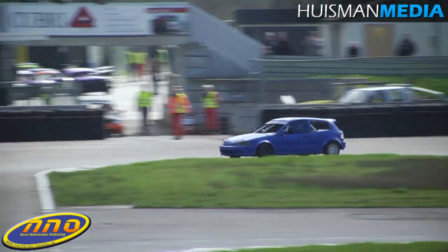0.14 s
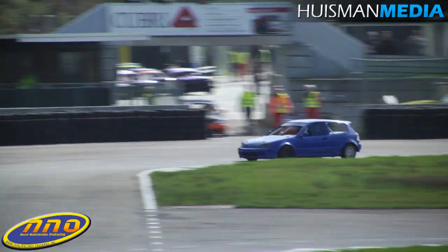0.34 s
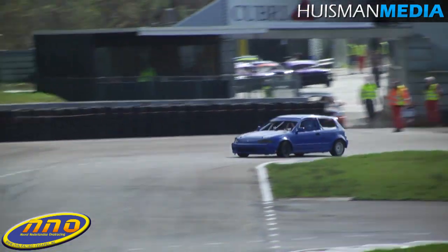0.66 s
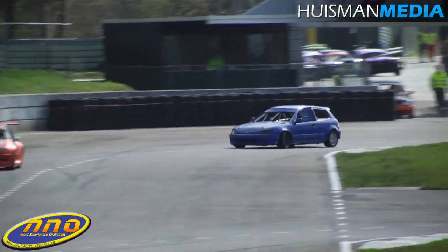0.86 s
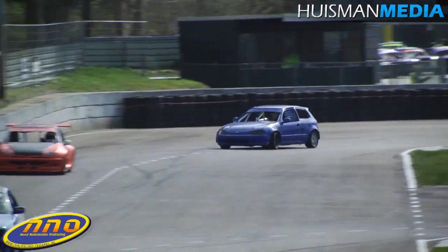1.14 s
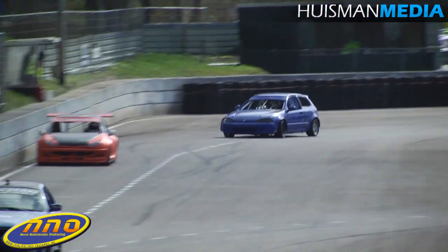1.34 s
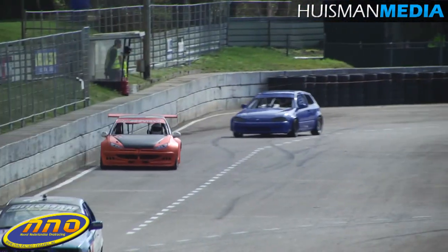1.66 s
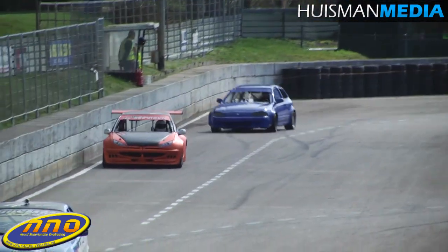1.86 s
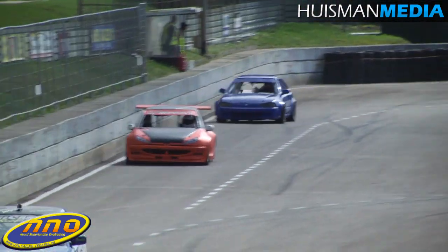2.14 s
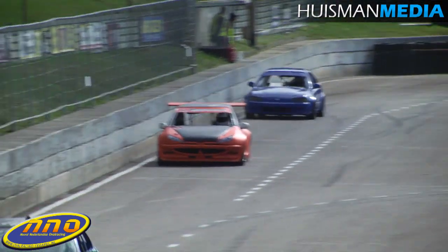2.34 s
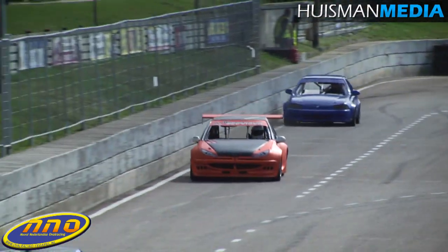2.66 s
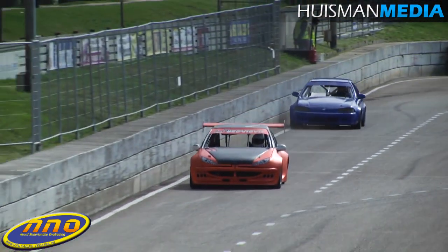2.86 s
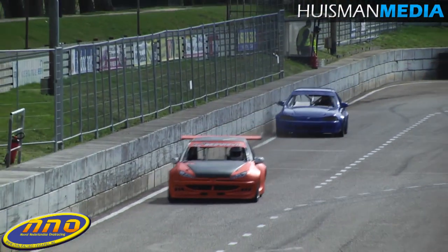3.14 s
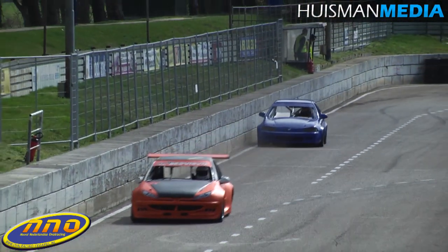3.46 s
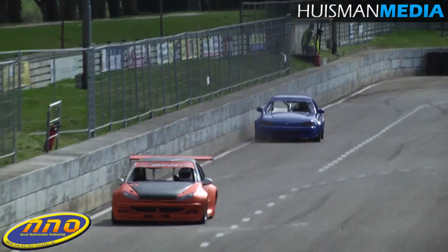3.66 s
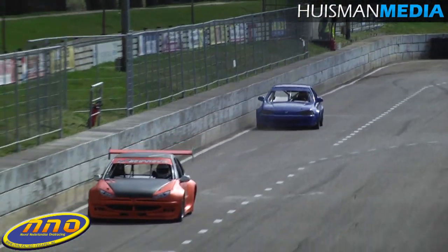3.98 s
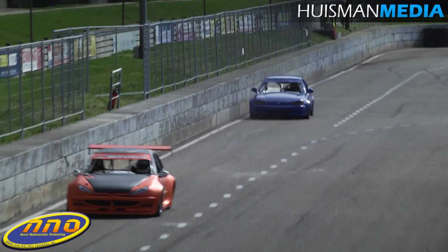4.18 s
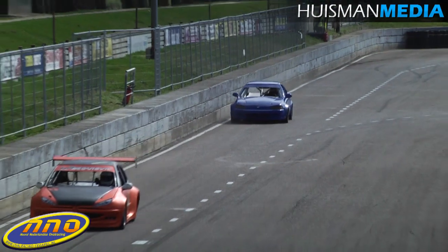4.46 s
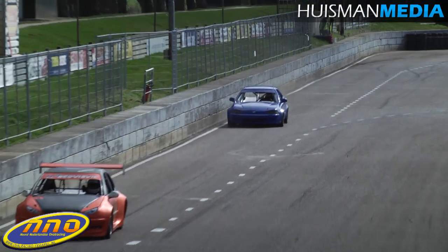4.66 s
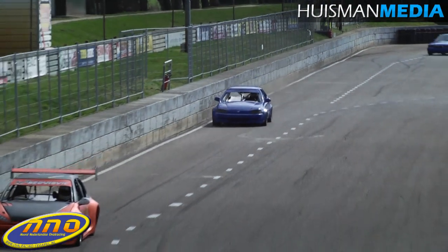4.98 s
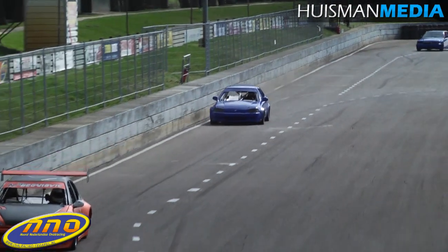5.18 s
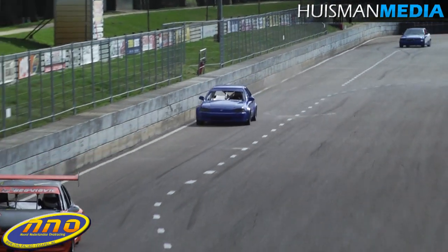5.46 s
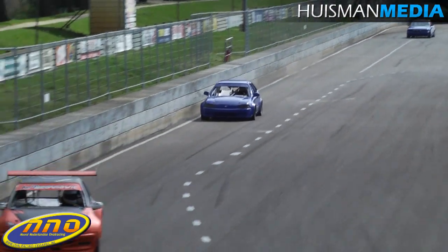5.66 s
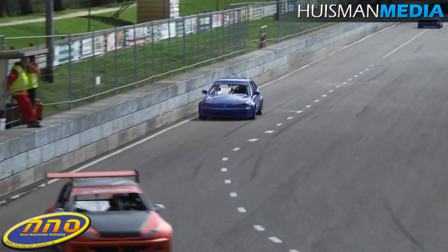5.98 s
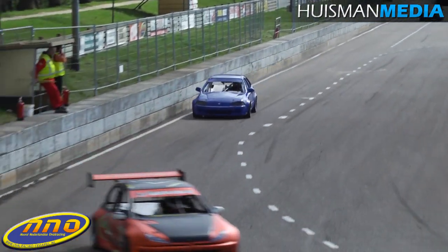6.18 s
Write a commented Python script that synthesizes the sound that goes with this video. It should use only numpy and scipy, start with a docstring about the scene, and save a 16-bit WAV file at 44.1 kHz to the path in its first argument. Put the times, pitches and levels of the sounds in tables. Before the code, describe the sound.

Several race cars leave a bend and approach a trackside microphone on an outdoor circuit. A high engine lifts off in the distance, then a hatchback blips and rattles as it pulls away. A deeper, booming car climbs through its revs while tyres chirp briefly. It slows with a falling gear whine, other engines rev up, and an exhaust bangs near the end. Road rumble and intake rasp run underneath.

```python
"""Race cars leave a bend and come down a walled straight, each sounding its firing rate and overtones.
From the start, over road rumble and intake rasp, a six-cylinder lifts far off and a winged car booms.
A hatchback blips and rattles out of the bend while the winged car climbs through its revs. Midway a tyre
chirps by stick-slip and a car coasts in the pit lane. The winged car brakes with whining gears; last,
the hatchback pulls in its next gear, the pit car revs, and unburnt fuel bangs in an exhaust."""
import sys
import numpy as np
from scipy import signal
from scipy.fft import rfft, irfft, next_fast_len
from scipy.io import wavfile
from scipy.ndimage import uniform_filter1d, map_coordinates

SR = 44100
rng = np.random.default_rng(int(sys.argv[2]) if len(sys.argv) > 2 else 0)


def digitize_waveform(pressure):
    """Quantize a signal to 16-bit integers and store it at the path in sys.argv[1].

    Rows of a 2-D input are taken as channels; values are limited to [-1, 1].
    """
    field = np.atleast_2d(pressure).T
    bounded = np.clip(field, -1, 1)
    quanta = np.round(bounded * 32767).astype(np.int16)
    wavfile.write(sys.argv[1], SR, quanta)


N = 278712

# noise spectra: (frequency [Hz], relative spectral density [dB])
RUMBLE_SPECTRUM = [(20, -16.5), (40, -6.5), (65, -2), (100, 3.5), (140, -4.5), (200, -9.5), (400, -68)]
DRONE_SPECTRUM = [(100, -41), (160, -16.5), (200, 5.5), (280, 5), (340, -2), (450, 1.5), (560, -2.5),
                  (650, -9.5), (800, -2), (980, -13), (1200, -9), (1500, -28.5), (2500, -66)]
RASP_SPECTRUM = [(500, -39), (900, -2), (1150, -3), (1400, -0.5), (1800, -0.5), (2100, -1.5), (2500, -1.5),
                 (3000, -4), (3300, -10), (3700, -19.5), (4200, -30.5), (6000, -56)]
HISS_SPECTRUM = [(3000, -37.5), (4200, -7), (5100, 1), (6100, -2), (6900, -12.5), (8200, -19.5),
                 (10500, -26), (12000, -38.5), (15500, -46.5)]
TICK_SPECTRUM = [(5000, -17.5), (7500, -1), (9500, 0.5), (11500, -9), (15000, -14)]
BACKFIRE_SPECTRUM = [(30, -20), (90, -2), (300, 0), (600, -2), (1000, -7), (2800, -19), (4000, -40),
                     (7000, -66), (10000, -100)]
GAS_SPECTRUM = [(120, -20), (180, 6.5), (300, -2), (450, -1.5), (620, -10.5), (760, -9.5), (900, -5),
                (1000, -16), (1300, -13.5), (2000, -27.5), (4000, -72.5)]
# envelopes of the background noises: (time [s], relative level [dB])
RUMBLE_LEVELS = [(0, -46), (.8, -46), (1.2, -42), (2.2, -39.5), (2.5, -43), (3.15, -46), (3.5, -56),
                 (4.15, -48), (4.55, -52), (5.1, -38.5), (6.32, -39)]
DRONE_LEVELS = [(0, -30), (.6, -30.5), (1.3, -30.5), (2, -29), (2.6, -26.5), (3, -29.5), (3.7, -31),
                (4.35, -31), (5.3, -23.5), (5.6, -26), (6.32, -28)]
RASP_LEVELS = [(0.05, -42.5), (0.35, -43.5), (2.24, -36.5), (2.26, -40), (2.44, -35), (3.13, -41),
               (3.41, -39), (3.43, -46), (3.78, -41.5), (4.54, -41.5), (4.96, -32.5), (5.19, -32.5),
               (5.45, -35), (5.81, -31.5), (5.9, -36), (6.3, -37.5)]
# brief swells of the hiss: (time [s], half width [s], rise [dB])
HISS_SWELLS = [(.25, 0.2, 8), (1.42, 0.087, 4.5), (2.62, 0.092, 3.5), (3.25, 0.14, 3), (4.05, .09, 2.5)]
# likeness of the noise at left and right: (frequency [Hz], correlation [1])
STEREO_COHERENCE = [(30, .88), (70, .965), (130, .978), (300, .991), (600, .988), (1200, .97), (3000, .95),
                    (4200, .65), (6000, .2), (12000, .05)]
# reverberation off walls and stands: (frequency [Hz], time to fall 60 dB [s])
REVERB_TIMES = [(150, 1), (1000, 1), (5000, 0.037)]
# short transients: (time [s], level [dB])
TICKS = [(.555, -76), (.588, -73.5), (.655, -76), (.737, -79), (.922, -73), (.96, -76), (1.17, -77),
         (1.21, -77)]
BACKFIRES = [(.637, -30), (6.047, -22), (6.0815, -19.5), (6.085, -19.5)]
# gliding tones: (peak time [s], half width [s], frequency [Hz], glide [Hz/s], level [dB])
LONE_ENGINE_NOTES = [(.68, .05, 915, -400, -31), (1.03, .18, 930, 75, -39), (1.08, .3, 451, 75, -32)]
TYRE_CHIRPS = [(2.74, 0.11, 1140, -350, -36), (3.144, 0.042, 799, 0, -23), (3.222, .03, 820, -900, -22),
               (3.362, 0.038, 816, -350, -24), (3.92, 0.036, 805, 0, -34), (4.035, 0.035, 858, -600, -33)]
WINGED_HIGH_OVERTONES = [(4.88, .045, 1890, -1400, -37), (5, .07, 1735, -700, -38),
                         (4.97, .08, 1900, -700, -41), (5.13, .06, 1445, -550, -37)]
# tooth-meshing tone: (time [s], frequency [Hz], level [dB])
GEAR_MESH = [(4.84, 2720, -48), (4.89, 2660, -41), (4.98, 2590, -43), (5.07, 2495, -40),
             (5.18, 2415, -38.5), (5.26, 2320, -44), (5.35, 2255, -41), (5.42, 2170, -50),
             (5.58, 2030, -44)]
# gear pairs that whine together: (ratio to the mesh frequency [1], relative level [dB])
GEAR_PAIRS = [(1, 0), (.958, -3)]
# engine speeds: (time [s], firing rate [Hz])
SIX_REVS = [(0, 348), (.38, 365), (.5, 346)]
PIT_REVS = [(2.8, 102), (3.15, 112), (4.1, 66), (4.25, 117), (4.98, 52), (5.24, 66), (5.33, 97),
            (5.42, 121), (5.48, 150), (5.54, 175), (5.63, 196), (5.8, 174), (5.97, 202), (6.32, 180)]
HATCH_BEND_REVS = [(.6, 336), (.64, 349), (.69, 349), (.75, 321), (.79, 299), (.86, 280), (.93, 259),
                   (1.05, 267.6), (1.6, 286), (2.22, 306), (2.32, 296), (3, 279)]
HATCH_STRAIGHT_REVS = [(4, 226), (4.3, 233), (4.6, 248), (5, 255), (6.07, 290), (6.17, 275), (6.32, 273)]
WINGED_REVS = [(0, 186), (.2, 175), (.5, 190), (1, 223), (1.15, 199), (1.45, 210), (1.65, 198), (2.5, 245),
               (3.7, 293), (4.12, 304), (4.27, 286), (4.5, 277), (5.1, 208), (5.4, 190)]
# spells when an engine sounds louder, pulling or booming on the overrun, ahead of dips and resonance:
# (start [s], end [s], firing tone level [dB], its swell [dB/s], overtone level [dB])
SIX_SURGES = [(-.03, .1, -17.5, 1.5, -32), (.09, 0.402, -21, -6.5, -28)]
PIT_SURGES = [(5.28, 5.37, -20.5, -4, -26.5), (5.46, 5.56, -30, 0, -24), (5.52, 5.67, -18, -4, -33),
              (5.86, 6.01, -22, 7, -37)]
HATCH_BEND_SURGES = [(.62, .73, -17, 0, -40), (.635, .75, -30, 0, -29.5), (.76, .86, -24.5, 25, -26),
                     (.88, 1.2, -25.5, -3, -26), (1.15, 1.85, -24.5, 0, -25.3),
                     (1.85, 2.05, -21.3, 0, -25.3), (2.05, 2.23, -21.5, 0, -25.8),
                     (2.25, 2.45, -21.5, 16, -33)]
HATCH_STRAIGHT_SURGES = [(4.95, 5.31, -27.5, 13, -33), (5.5, 5.66, -25, 0, -33), (5.65, 5.88, -19, 8, -33),
                         (5.88, 6.08, -17.5, 0, -39), (6.08, 6.32, -20.5, -1, -39)]
WINGED_SURGES = [(.05, .38, -27.5, 3, -41), (.47, .76, -22.5, -8, -42.5), (1.12, 1.56, -23.5, -8, -36),
                 (1.9, 2.5, -27, 13, -39), (2.47, 4.15, -15.4, 1.5, -31.5), (4.23, 4.28, -19.5, 2, -36),
                 (4.65, 5.02, -24.5, 13, -36.5), (5.02, 5.3, -23, -6, -38)]
# intake and exhaust overtones: (multiple of the four-stroke cycle rate [1], relative level [dB])
AIRBOX_HARMONICS = [(25, -13), (26, 0), (27, -5), (28, -11)]
SIX_HARMONICS = [(3, -15), (4, -10), (5, -21), (7, -20), (8, -24), (9, -17), (10, -24), (12, -15),
                 (13, -18), (14, -13), (15, -19), (16, -18), (18, -25), (20, -26), (22, -25), (25, -26),
                 (26, -23), (27, -25), (28, -24), (30, -28), (33, -30), (36, -30), (38, -29), (42, -27),
                 (45, -29), (48, -31)]
WINGED_HARMONICS = [(3, -17), (5, -20), (6, -27), (7, -23), (9, -32), (10, -33), (11, -29), (12, -30)]
# exhaust overtones: (multiple of the crankshaft rate [1], relative level [dB])
PIT_HARMONICS = [(1, -5), (3, -6), (4, 3), (5, -10), (6, -8), (7, -17), (8, -18), (10, -21)]
HATCH_BEND_HARMONICS = [(1, -13), (3, -3), (4, -5), (5, -6), (6, -5), (7, -15), (8, -20), (9, -18),
                        (10, -25), (11, -22), (12, -27), (13, -25), (15, -25), (16, -25)]
HATCH_STRAIGHT_HARMONICS = [(3, -7), (4, 0), (5, -13), (6, -9), (7, -15), (8, -8), (12, -12), (14, -11)]
# brief dips in an engine's sound: (time [s], half width [s], depth [dB])
PIT_DIPS = [(3.72, 0.33, 5.5), (4.13, 0.059, 4)]
HATCH_DIPS = [(.93, .05, 11), (1.58, .15, 9), (5.79, .015, 9), (5.9, .015, 4), (5.97, .018, 7),
              (6.03, .015, 9), (6.115, .02, 5)]
WINGED_DIPS = [(2.7, .015, 6), (2.875, .02, 4), (3.115, .02, 7), (3.195, .015, 9), (3.27, .025, 8),
               (3.58, .025, 3.5), (3.68, .018, 4), (4.21, .02, 9)]
# exhaust resonances: (frequency [Hz], relative gain [dB])
PIT_SILENCER = [(38, -12), (58, 1), (110, 2), (150, -2), (200, -2), (250, 2), (320, 4), (365, -1), (420, 0),
                (600, 1)]
RATTLE_PIPE = [(80, -22), (170, -1), (300, 0), (480, -1), (650, -11), (1000, -17), (1400, -20), (2200, -32),
               (4000, -70)]
HATCH_SIDE_PIPE = [(300, 0), (400, 2.5), (425, 0), (440, -2), (456, 7), (475, 1), (520, -5), (560, 0),
                   (600, 3), (650, -3), (700, 0), (750, 3), (815, 4), (855, 4), (880, 1), (910, 1),
                   (940, 2), (990, -9), (1045, -8), (1075, 0), (1240, 3), (1400, -3), (1800, 1)]
HATCH_FRONT_PIPE = [(500, 0), (535, 0), (565, -5), (850, -2), (1040, 0), (1100, 4), (1200, 0), (1600, 3),
                    (1800, 0), (1880, 2), (1930, 8), (1980, 3), (2030, 0)]
# pipe resonance that the octave slides through: (frequency [Hz], level re the firing tone [dB])
WINGED_PIPE = [(350, -15), (425, -9), (450, -7), (468, -13), (483, -7), (497, -16), (510, -11), (520, -24),
               (600, -36)]

TIME = np.arange(N) / SR


def amp(db):
    """Amplitude ratio of a level in decibels."""
    return 10 ** (np.asarray(db) / 20)


def unit(x):
    """Normalisation to an rms of 1."""
    return x / np.sqrt(np.mean(x ** 2) + 1e-20)


def along(points, hz):
    """Interpolation of (frequency [Hz], value) points on a logarithmic frequency axis."""
    freqs, values = np.transpose(points)
    return np.interp(np.log(hz + 1), np.log(freqs + 1), values)


def curves(rows):
    """Linear interpolation in time: one curve for each column after the first."""
    times, *columns = np.transpose(rows)
    return [np.interp(TIME, times, column) for column in columns]


def during(rows, fade_s=0.12):
    """Trapezoidal window: 1 over a table's time span, fading to 0 outside."""
    return np.clip(1 + np.minimum(TIME - rows[0][0], rows[-1][0] - TIME) / fade_s, 0, 1)


def bump(peak_s, width_s):
    """Gaussian window of height 1."""
    return np.exp(-((TIME - peak_s) / width_s) ** 2)


def dips(rows):
    """Brief attenuation: a gain of 1 with bell-shaped dips."""
    return amp(-sum(depth_db * bump(s, width) for s, width, depth_db in rows))


def wobble(rate):
    """Slow random modulation: a spline through rate random knots a second."""
    knots = rng.standard_normal(4096)
    coarse = np.arange(0, N + 32, 32)
    return np.interp(np.arange(N), coarse, map_coordinates(knots, [coarse * rate / SR], mode="mirror"))


def angle(hz):
    """Phase as the time integral of frequency."""
    return 2 * np.pi * np.cumsum(hz) / SR


def filtered(x, response):
    """Zero-phase filtering: the spectrum of x times a frequency response."""
    size = next_fast_len(N + SR // 2)
    return irfft(rfft(x, size) * response(np.fft.rfftfreq(size, 1 / SR)), size)[..., :N]


def ring(x, resonance):
    """Minimum-phase resonance: it rings only after each excitation."""
    size = 4096
    cepstrum = irfft(np.log(amp(along(resonance, np.fft.rfftfreq(size, 1 / SR)))))
    causal_fold = 1 + np.sign(size / 2 - np.arange(size)) - (np.arange(size) == 0)
    impulse_response = irfft(np.exp(rfft(cepstrum * causal_fold)))
    return signal.fftconvolve(x, impulse_response)[:N]


def rush(spectrum, patchy_db):
    """Partly coherent stereo noise of rms 1, its gain patchy in time and frequency."""
    white = signal.stft(rng.standard_normal((2, N)), nperseg=1024)[2]
    patches = uniform_filter1d(rng.standard_normal(white.shape[1:]), size=4, axis=0)
    patches = uniform_filter1d(patches, size=10, axis=1)
    pair = signal.istft(white * amp(patchy_db * unit(patches)), nperseg=1024)[1][:, :N]
    spread = lambda hz: np.arccos(np.clip(along(STEREO_COHERENCE, hz), -1, 1)) / 2
    shares = lambda hz: np.array([np.cos(spread(hz)), np.sin(spread(hz))])
    mid, side = filtered(pair, lambda hz: amp(along(spectrum, hz)) * shares(hz))
    return unit(np.array([mid + side, mid - side]))


def narrow_tone(hz, db, waver, flutter_db):
    """Line broadening: random frequency and amplitude modulation blur a tone."""
    carrier = np.sin(angle(hz * (1 + waver * wobble(130))))
    return amp(db) * unit(carrier * amp(flutter_db * wobble(40)))


def glides(rows, waver, flutter_db):
    """Linear frequency sweeps, each swelling and fading."""
    return sum(bump(s, width) * narrow_tone(hz + glide * (TIME - s), db, waver, flutter_db)
               for s, width, hz, glide, db in rows)


def road_rumble():
    """Low-frequency noise from the road."""
    return amp(curves(RUMBLE_LEVELS)[0] + 7) * rush(RUMBLE_SPECTRUM, patchy_db=2)


def far_drone():
    """Incoherent summation: distant cars merge into a band of noise."""
    return amp(curves(DRONE_LEVELS)[0] + 2) * rush(DRONE_SPECTRUM, patchy_db=2)


def intake_rasp():
    """Amplitude modulation: the intake noise of all cars pulses with the winged car's firings."""
    level_db = uniform_filter1d(curves(RASP_LEVELS)[0], size=SR // 12)
    swells_db = sum(db * bump(s, width) for s, width, db in HISS_SWELLS)
    approach_db = 2 * TIME  # air absorbs less treble as the cars close in
    firing = angle(curves(WINGED_REVS)[0])
    gulps = 1 + 0.088 * np.cos(firing) + 0.026 * np.cos(firing / 4) + 0.029 * wobble(110)
    rasp = amp(level_db + 2) * rush(RASP_SPECTRUM, patchy_db=1.5)
    hiss = amp(level_db - 27.5 + approach_db + swells_db) * rush(HISS_SPECTRUM, patchy_db=3)
    return gulps * (rasp + hiss)


def ticks():
    """Windowed treble noise: faint, soft ticks within the hiss."""
    envelope = sum(amp(db) * bump(s, width_s=0.011) for s, db in TICKS)
    return envelope * unit(filtered(rng.standard_normal(N), lambda hz: amp(along(TICK_SPECTRUM, hz))))


def wall_echo(x):
    """Reverberation: reflections off walls and stands decay exponentially, the treble fastest."""
    hz, t, noise = signal.stft(rng.standard_normal(SR // 2), SR, nperseg=256)
    decay = amp(-60 * t / along(REVERB_TIMES, hz)[:, None])
    tail = signal.istft(noise * decay, SR, nperseg=256)[1]
    delayed = np.pad(tail, (900, 0))  # about 20 ms
    return signal.fftconvolve(x, delayed / np.linalg.norm(tail))[:N]


def lone_partials():
    """Isolated partials: single overtones glide alone, one falling with the hatchback's blip, two rising from
    cars further back in the bend."""
    return glides(LONE_ENGINE_NOTES, waver=0.0065, flutter_db=2)


def gear_whine():
    """Tooth meshing: straight-cut gear pairs fall in pitch as the car slows."""
    hz, db = curves(GEAR_MESH)
    mesh = sum(narrow_tone(ratio * hz, db + pair_db, waver=0.003, flutter_db=3)
               for ratio, pair_db in GEAR_PAIRS)
    return during(GEAR_MESH) * mesh


def winged_engine_whine():
    """High harmonics: brief falling whines from the slowing winged car's engine."""
    return glides(WINGED_HIGH_OVERTONES, waver=0.003, flutter_db=2)


def tyre_squeal(octave_db=-20.5):
    """Stick-slip oscillation: rubber on tarmac gives thin chirps with a weak octave."""
    octaves = [(s, width, 2 * hz, 2 * glide, db + octave_db) for s, width, hz, glide, db in TYRE_CHIRPS]
    return glides(TYRE_CHIRPS + octaves, waver=0.012, flutter_db=1.5)


def backfires(pulse_s=0.0008, pulse_db=11, t60_s=0.07):
    """Blast waves: unburnt fuel bangs in the pipe, a pressure pulse and a decaying burst of noise."""
    blast = lambda age: (1 - age) * np.exp(-age)
    pulses = sum(amp(db + pulse_db) * blast(np.abs(TIME - s) / pulse_s) * (TIME >= s)
                 for s, db in BACKFIRES)
    envelope = sum(amp(db - 60 * np.abs(TIME - s) / t60_s) * (TIME >= s) for s, db in BACKFIRES)
    colour = lambda hz: amp(along(BACKFIRE_SPECTRUM, hz))
    bursts = filtered(envelope * rng.standard_normal(N), lambda hz: unit(colour(hz)))
    return bursts - filtered(pulses, colour)


def envelopes(surges, coast_tone_db, coast_bark_db, attack_s=0.023, decay_s=0.029):
    """Gains of firing tone and overtones (bark): linear attack, exponential decay to coasting."""
    tone, bark = amp(coast_tone_db), amp(coast_bark_db)
    for start, end, tone_db, swell, bark_db in surges:
        gate = np.clip((TIME - start) / attack_s, 0, 1) * np.exp(-np.maximum(TIME - end, 0) / decay_s)
        held_s = np.clip(TIME, start, end) - start
        tone = np.maximum(tone, gate * amp(tone_db + swell * held_s))
        bark = np.maximum(bark, gate * amp(bark_db))
    return tone, bark


def overtones(phase, harmonics, rough, smear=1):
    """Fourier series of separately fading partials; with little phase smear they form sharp pulses."""
    partials = 0
    for order, db in harmonics:
        gain = amp(db) * amp(1.7 * wobble(9))
        partials += gain * np.sin(order * phase + smear * rng.uniform(0, 2 * np.pi) + rough * wobble(45))
    return unit(partials * (1 + rough * wobble(160)))


def exhaust(revs, tone, bark, harmonics, firings, rough, jitter, fade_db, smear=1):
    """Periodic pulsation: a firing tone plus the harmonics of a pattern several firings long."""
    phase = angle(curves(revs)[0] * (1 + jitter * wobble(30))) / firings
    strength = 1 + rough * wobble(70) / 2  # no two firings are equally strong
    fading = amp(fade_db * wobble(18))  # the tone fades in and out on its way
    firing_tone = unit(np.sin(firings * phase) * strength * fading)
    return during(revs) * (tone * firing_tone + bark * overtones(phase, harmonics, rough, smear))


def six_cylinder(honk_db=-2):
    """Directivity: the airbox honks while it faces the listener; the engine runs flat out, then lifts."""
    tone, bark = envelopes(SIX_SURGES, coast_tone_db=-43.5, coast_bark_db=-34.5)
    cycle = angle(curves(SIX_REVS)[0]) / 6
    facing = amp(honk_db) * bump(peak_s=0.06, width_s=0.11)
    honk = during(SIX_REVS) * bark * facing * overtones(cycle, AIRBOX_HARMONICS, rough=0.089)
    return honk + exhaust(SIX_REVS, tone, bark, SIX_HARMONICS,
                          firings=6, rough=0.15, jitter=0.0023, fade_db=0.1)


def pit_car(db_per_octave=9.5):
    """Source and filter: a lumpy engine nearby runs down twice and revs up through its silencer."""
    speed_db = db_per_octave * np.log2(curves(PIT_REVS)[0] / 100)  # faster coasting is louder
    tone, bark = envelopes(PIT_SURGES, coast_tone_db=speed_db - 38, coast_bark_db=speed_db - 38.5)
    source = exhaust(PIT_REVS, tone, bark, PIT_HARMONICS,
                     firings=2, rough=0.25, jitter=0.0022, fade_db=1.2)
    return dips(PIT_DIPS) * ring(source, PIT_SILENCER)


def pipe_rattle(crank, scatter_db=2.5):
    """Impulse excitation: one uneven blow a crankshaft turn rings the pipe, swelling and fading near 2 s."""
    turns = np.flatnonzero(np.diff(crank // (2 * np.pi)))
    size, scatter = rng.standard_normal((len(turns), 2)).T
    blows = np.bincount(turns, size * amp(scatter_db * scatter), minlength=N)
    return unit(ring(np.tanh(blows / 2), RATTLE_PIPE)) * bump(peak_s=1.97, width_s=0.45)


def hatchback_in_bend(gas_db=-9, rattle_db=-0.5):
    """Pipe resonance heard side-on: the exhaust blips and pulls, with pulsed gas noise and a rattle."""
    tone, bark = envelopes(HATCH_BEND_SURGES, coast_tone_db=-33.5, coast_bark_db=-41)
    source = exhaust(HATCH_BEND_REVS, tone * dips(HATCH_DIPS), bark, HATCH_BEND_HARMONICS,
                     firings=2, rough=0.2, jitter=0.0025, fade_db=0.8, smear=0.35)
    crank = angle(curves(HATCH_BEND_REVS)[0]) / 2
    puffs = (1 + np.cos(crank)) ** 2 * rng.standard_normal(N)
    growl = amp(gas_db) * unit(ring(puffs, GAS_SPECTRUM)) + amp(rattle_db) * pipe_rattle(crank)
    return during(HATCH_BEND_REVS) * bark * growl + ring(source, HATCH_SIDE_PIPE)


def hatchback_on_straight():
    """Pipe resonance heard head-on: in the next gear the overtones slide through fixed peaks."""
    tone, bark = envelopes(HATCH_STRAIGHT_SURGES, coast_tone_db=-30.5, coast_bark_db=-41)
    source = exhaust(HATCH_STRAIGHT_REVS, tone * dips(HATCH_DIPS), bark, HATCH_STRAIGHT_HARMONICS,
                     firings=2, rough=0.4, jitter=0.002, fade_db=1.2)
    return ring(source, HATCH_FRONT_PIPE)


def winged_car():
    """Resonance swells the octave of a nearly pure firing tone; four unequal cylinders add faint lines."""
    hz = curves(WINGED_REVS)[0]
    tone, bark = envelopes(WINGED_SURGES, coast_tone_db=-31.5 + 0.46 * TIME, coast_bark_db=-41.5)
    tone = tone * dips(WINGED_DIPS)
    pipe_gain = amp(along(WINGED_PIPE, 2 * hz))
    octave = tone * pipe_gain * unit(np.sin(2 * angle(hz) + 0.21 * wobble(35)))
    boom = exhaust(WINGED_REVS, tone, bark, WINGED_HARMONICS,
                   firings=4, rough=0.22, jitter=0.0022, fade_db=0.4)
    return during(WINGED_REVS) * octave + boom


def scene():
    """Superposition: the cars lie straight ahead, the leader's exhaust with less echo than the rest."""
    leader = winged_car()
    others = six_cylinder() + hatchback_in_bend() + hatchback_on_straight() + pit_car()
    others += tyre_squeal() + gear_whine() + winged_engine_whine() + lone_partials()
    walls = wall_echo(amp(-32) * leader + amp(-22) * others)
    return leader + others + walls + backfires() + ticks() + road_rumble() + far_drone() + intake_rasp()


def record(dry, cutoff_hz=15700):
    """Band limiting: an ideal low-pass filter passes nothing above its cutoff."""
    return filtered(dry, lambda hz: hz < cutoff_hz)


dry = scene()
out = record(dry)
digitize_waveform(out)
```